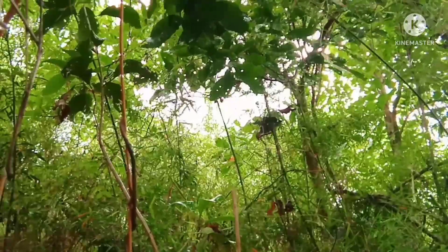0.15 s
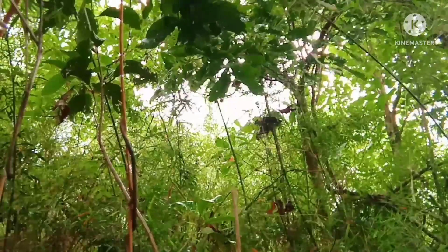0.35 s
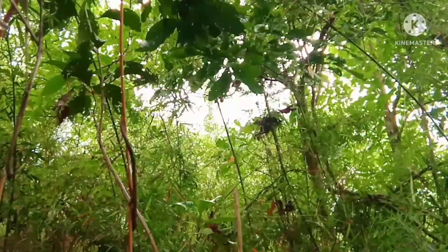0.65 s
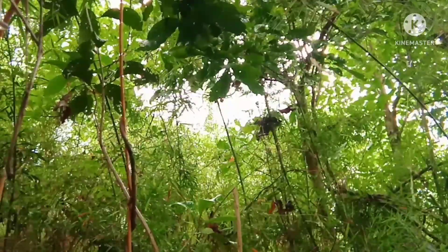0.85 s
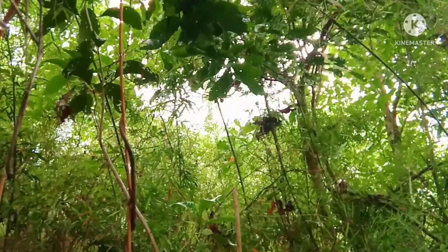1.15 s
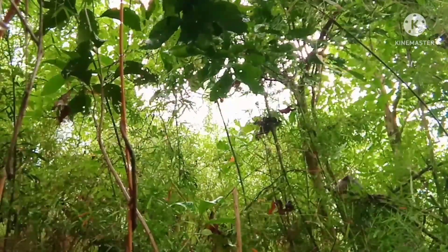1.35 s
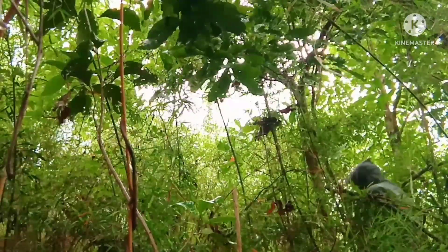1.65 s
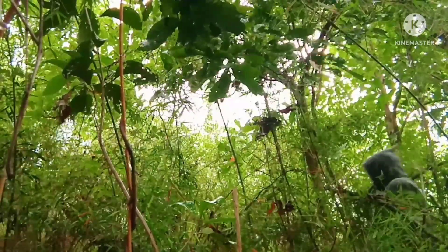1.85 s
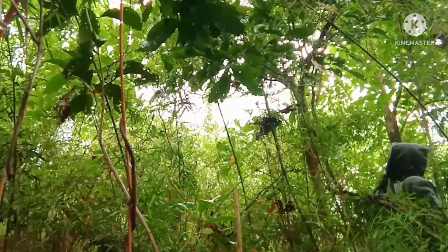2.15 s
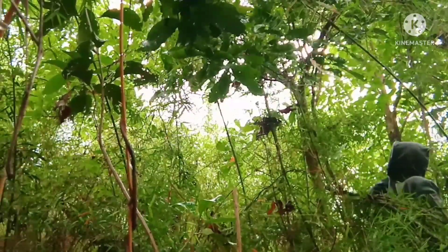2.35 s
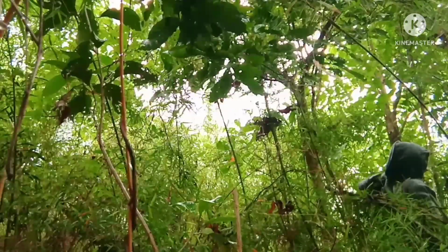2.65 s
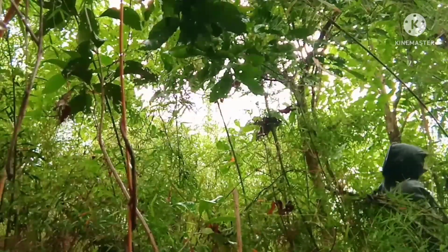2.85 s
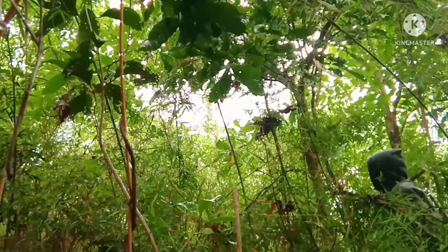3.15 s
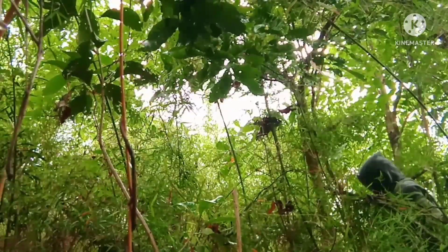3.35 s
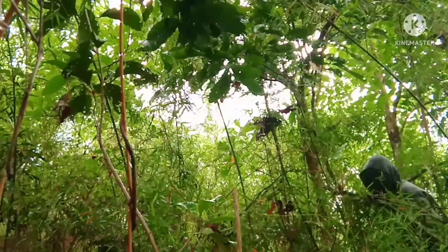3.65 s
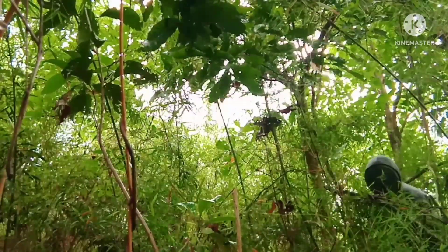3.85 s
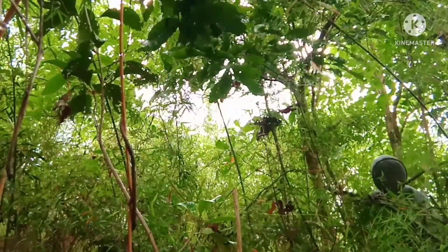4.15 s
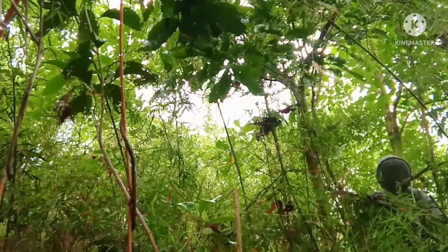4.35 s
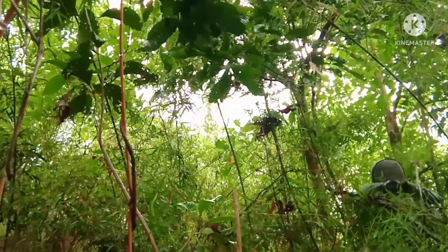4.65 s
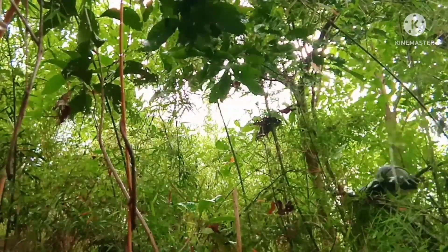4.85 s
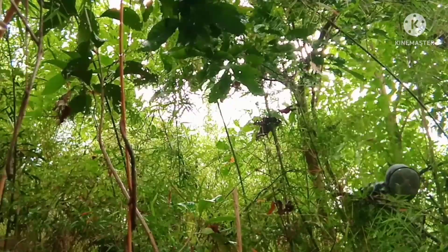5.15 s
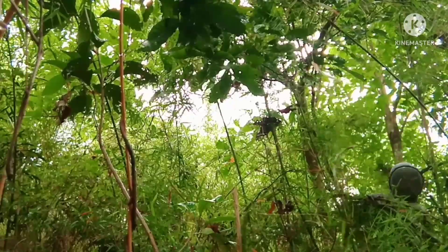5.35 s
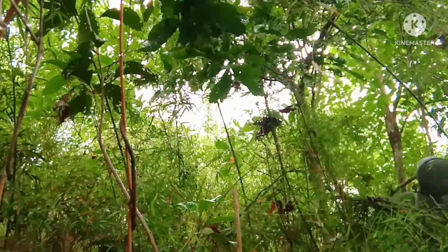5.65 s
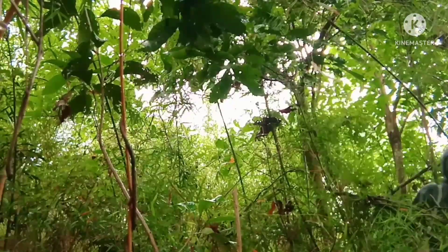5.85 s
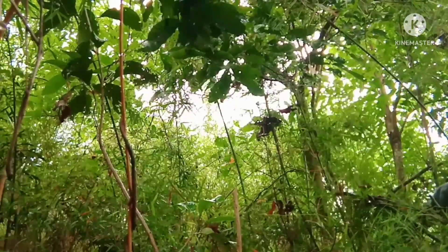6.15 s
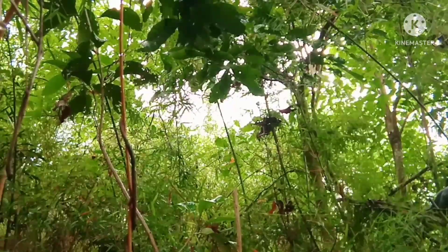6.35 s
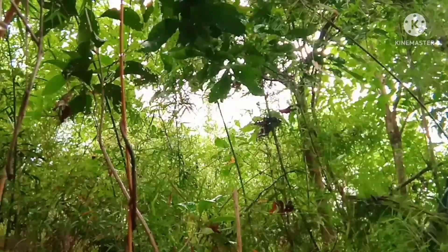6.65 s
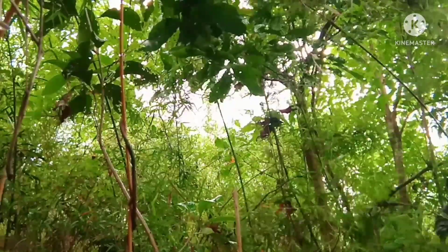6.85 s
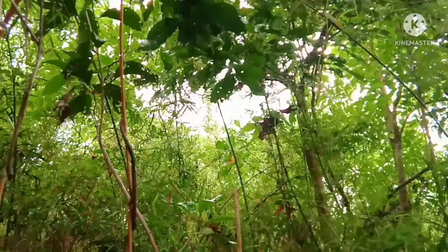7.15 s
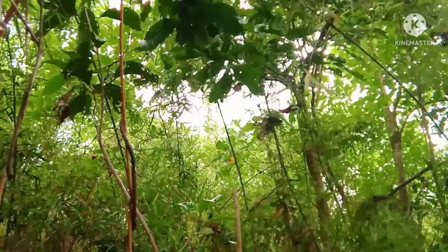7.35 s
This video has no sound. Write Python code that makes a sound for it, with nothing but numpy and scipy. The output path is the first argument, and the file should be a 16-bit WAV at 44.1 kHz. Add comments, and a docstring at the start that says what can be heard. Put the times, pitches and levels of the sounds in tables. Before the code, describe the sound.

Deep, steady buzzing of a hovering bee, with more bees behind, a cicada chorus and faint twig cracks in the undergrowth.

```python
"""A deep drone comes first: a large bee hovers close by in a bamboo thicket, beating its wings about
117 times a second. Each beat adds a puff of air, a flick and a snap to the hum. Other bees hum behind
it and a few dart past, dropping in pitch. Cicadas shrill in the trees over faint air, foliage and
recorder hiss, and dry twigs and leaves tick as someone moves through the undergrowth."""
import sys
import numpy as np
from scipy import signal
from scipy.fft import rfft, irfft, next_fast_len
from scipy.io import wavfile
from scipy.ndimage import uniform_filter1d, map_coordinates

SR = 44100
rng = np.random.default_rng(int(sys.argv[2]) if len(sys.argv) > 2 else 0)


def file_out(sig):
    """Save sig as 16-bit WAV at sys.argv[1]."""
    # one column per channel
    cols = np.atleast_2d(sig).T
    # limit, then scale
    lim = np.clip(cols, -1, 1)
    pcm = np.round(lim * 32767).astype(np.int16)
    wavfile.write(sys.argv[1], SR, pcm)


N = 330970
TIME = np.arange(N) / SR


def amp(db):
    """Turns decibels into a number to multiply by."""
    return 10 ** (np.asarray(db) / 20)


def unit(x):
    """Scales x to an average strength (rms) of 1."""
    return x / np.sqrt(np.mean(x ** 2) + 1e-20)


def curve(rows):
    """Joins (time, value) points with straight lines: one value per sample."""
    return np.interp(TIME, *np.transpose(rows))


def bump(at, half):
    """A smooth hill, 1 high at time `at` and about a third as high `half` seconds to either side."""
    return np.exp(-((TIME - at) / half) ** 2)


def level_at(points, hz):
    """Looks up the level at hz in a table of (frequency, level) points."""
    f, db = np.transpose(points)
    return np.interp(np.log(hz + 1), np.log(f + 1), db)


def colour(x, points):
    """Gives x a table's balance of low and high frequencies, then scales it to strength 1."""
    size = next_fast_len(len(x) + 2048)
    gains = amp(level_at(points, np.fft.rfftfreq(size, 1 / SR)))
    return unit(irfft(rfft(x, size) * gains, size)[:len(x)])


def wander(rate):
    """A smooth random wobble of strength 1 that changes about `rate` times a second."""
    knots = rng.standard_normal(4096)
    grid = np.arange(0, N, 32)
    smooth = map_coordinates(knots, [grid * rate / SR], mode="wrap")
    return unit(np.interp(np.arange(N), grid, smooth))


def cycles(hz):
    """Counts the vibrations completed so far as a pitch changes."""
    return np.cumsum(hz) / SR


# Tone colour of the quiet background, with the recorder's hiss near 14.4 kHz: f/Hz, level/dB
BACKGROUND_COLOUR = [(20, -9), (50, -3), (85, -9), (400, 0.5), (900, -8.5), (1600, -12.5), (2800, -28.5),
                     (4000, -39.5), (7000, -31.5), (10000, -38.5), (13700, -55), (14400, -23.5),
                     (15500, -36.5)]


def background(db=-48, swell_db=1):
    """Faint air and foliage, with the recorder's thin high hiss, make a soft, steady noise."""
    return amp(db + swell_db * wander(48)) * colour(rng.standard_normal(N), BACKGROUND_COLOUR)


def streaked_hiss(streak_db, width_hz, rise_per_s):
    """Hiss in which narrow bands of pitch stand out for a while and slowly rise."""
    hz, t, spectrum = signal.stft(rng.standard_normal(N), SR, nperseg=4096)
    lane = hz[:, None] * (1 - rise_per_s * t) / width_hz
    moment = np.broadcast_to(1.612 * t, lane.shape)
    streaks = map_coordinates(rng.standard_normal((2048, 32)), [lane, moment], order=1, mode="wrap")
    return signal.istft(spectrum * amp(streak_db * unit(streaks)), SR)[1][:N]


# Tone colour of many cicadas together: f/Hz, level/dB
CHORUS_SPECTRUM = [(2500, -20), (3700, -14.5), (4400, -7), (4800, -3), (5150, -2), (5500, -6), (6100, -4.5),
                   (6400, -10), (6650, -25), (7500, -28), (9000, -53)]


def cicada_chorus(db=-41, lull_db=-2, shimmer_db=0.5):
    """Many cicadas blur into one shimmering hiss that slowly eases off once and comes back."""
    hiss = streaked_hiss(streak_db=2.5, width_hz=19, rise_per_s=0.0088)
    level = db + lull_db * bump(at=4.77, half=1.6) + shimmer_db * wander(30)
    return amp(level) * colour(hiss, CHORUS_SPECTRUM)


def lone_cicada(start_s=0.36, length_s=7.05, low_hz=6870, high_hz=7280, width_hz=560):
    """One higher cicada repeats a long song that swells, climbs in pitch and quickly runs down."""
    progress = (TIME - start_s) / length_s % 1
    swell = abs(np.sin(np.pi * progress ** 1.8)) ** 0.65
    pitch = np.interp(progress, [0, 0.9, 1], [low_hz, high_hz, low_hz])
    carrier = np.exp(2j * np.pi * cycles(pitch))
    hiss = streaked_hiss(streak_db=-0.5, width_hz=25, rise_per_s=0.006)
    # Keep only the hiss near the pitch: shift it down to 0 Hz, filter it, shift it back.
    lowpass = signal.butter(3, width_hz / 2, fs=SR, output="sos")
    shrill = signal.sosfilt(lowpass, hiss / carrier) * carrier
    overtone = 1 + amp(-20) * np.exp(2j * np.pi * 1150 * TIME)  # adds a faint copy 1150 Hz higher
    return (amp(-71.5) + amp(-50) * swell) * unit((shrill * overtone).real)


# Pure notes in the chorus: t/s, level/dB, f/Hz, half length/s
CICADA_NOTES = [(1.9, -47.5, 4808, 0.62), (2.12, -47.5, 5500, 0.22), (2.4, -48.5, 5900, 0.2),
                (3.1, -57, 6120, 0.23), (4.53, -49, 6100, 0.24), (7.33, -43, 4640, 0.16)]


def cicada_notes(rise_per_s=0.0054, waver=0.0016):
    """Thin whistles fade in and out of the chorus, each rising a little."""
    out = np.zeros(N)
    for at, db, hz, half in CICADA_NOTES:
        pitch = hz * (1 + rise_per_s * (TIME - at) + waver * wander(90))
        out += amp(db) * bump(at, half) * unit(np.sin(2 * np.pi * cycles(pitch)))
    return out


def faint_twigs(count=7, db=-45.5, spread_db=8.5, rustle_s=0.02, knock_db=-14):
    """Extra rows for TWIG_CRACKS: small ticks in the undergrowth at random moments."""
    return [(when * N / SR, db + spread_db * (2 * force - 1), rustle_s, knock_db)
            for when, force in rng.random((count, 2))]


# Twigs cracking: t/s, relative level/dB, rustle length/s, knock boost/dB
TWIG_CRACKS = [(3.548, -35, 0.036, 8), (3.578, -27.5, .015, -4), (3.91, -35, 0.0077, -5),
               (3.935, -36, 0.027, -2), (4.629, -38, 0.022, -3), (5.029, -42, 0.0076, 13),
               (5.298, -32, 0.0044, -10), (5.536, -28, .013, 4), (6.616, -27, .013, -6),
               (6.885, -32, 0.043, -14), (7.009, -32, 0.018, -12), (7.087, -24, 0.0026, 6),
               (7.119, -33.5, .014, -11)]
# The notes a twig rings with: f/Hz, level/dB, time to fade by 60 dB/s
TWIG_RINGS = [(4300, -2, 0.047), (4140, -12, 0.043), (4910, 2.5, 0.0097), (4900, 1, 0.011)]
# Tone colour of dry crackling, with a thin microphone ring near 15 kHz: f/Hz, level/dB
CRACKLE_SPECTRUM = [(1000, -21.5), (3000, 16.5), (5000, 6), (7500, -3), (10000, -5.5), (13500, -9),
                    (15000, 8.5), (16000, -7.5)]


def twigs(crackle_db=-11, knock_db=-10, grain_db=5, settle_db=-17, settle_s=0.079, size=12000):
    """A twig cracks and rings briefly, then the leaves on it crackle and settle."""
    out, t = np.zeros(N + size), np.arange(size) / SR
    for at, db, rustle_s, boost_db in TWIG_CRACKS + faint_twigs():
        noise, grain_sizes = rng.standard_normal((2, size))
        grains = noise * amp(grain_db * unit(uniform_filter1d(grain_sizes, 25)))
        fade = np.exp(-t / rustle_s) + amp(settle_db) * np.exp(-t / settle_s)
        crackle = amp(crackle_db) * colour(grains, CRACKLE_SPECTRUM) * fade
        stiffness = rng.uniform(0.99, 1.01)  # each twig is tuned a little differently
        ring = sum(amp(ring_db - 60 * t / ring_s) * np.sin(2 * np.pi * hz * stiffness * t)
                   for hz, ring_db, ring_s in TWIG_RINGS)
        out[round(at * SR):][:size] += amp(db) * (crackle + amp(knock_db + boost_db) * ring)
    return out[:N]


def wing_buzz(hz, points, harmonics):
    """Beating wings make harmonics: tones at 1, 2, 3... times the rate of the beat."""
    angle = 2 * np.pi * (cycles(hz) + rng.random())
    return unit(sum(amp(level_at(points, k * hz.mean())) * np.cos(k * angle)
                    for k in range(1, harmonics + 1)))


# Tone colour of the farther bees: f/Hz, level/dB
FAR_BEE_COLOUR = [(150, -13), (300, -8.5), (450, -18.5), (750, -16.5), (1300, -16), (2500, -32.5)]


def far_bees(db=-46, hz=152, drift=0.04, swell_db=4, count=5):
    """Farther bees hum together, each wandering in pitch and distance."""
    out = np.zeros(N)
    for _ in range(count):
        pitch = hz * (1 + drift * wander(5) + 0.015 * wander(50))
        out += wing_buzz(pitch, FAR_BEE_COLOUR, harmonics=9) * amp(swell_db * wander(4))
    return amp(db) * unit(out)


# Bees darting past: t/s, level/dB, wingbeat f/Hz, half length/s
FLY_BYS = [(3.53, -27, 158.2, 0.033), (3.883, -34, 146, .035), (3.958, -34, 154.8, 0.031),
           (4.378, -38, 141.7, .07), (4.514, -32, 152, 0.044), (4.601, -28, 157.4, .03)]
# Tone colour of their buzz: f/Hz, level/dB
FLY_BY_COLOUR = [(140, -10), (158, 9.5), (300, 6), (450, -3), (750, -8), (1300, -12.5), (2500, -51)]
# Tone colour of air stirred by wings, theirs and the large bee's: f/Hz, level/dB
AIR_COLOUR = [(30, -4), (80, -11.5), (160, -0.5), (450, -6.5), (700, -9), (1100, -24), (1260, -15),
              (1450, -18.5), (2000, -13.5), (2700, -19), (4000, -32), (8000, -47)]


def passing_bees(pitch_drop=0.0081, unsteady=0.0089, air_share=0.21):
    """Each bee swells as it nears and drops in pitch as it leaves, dragging a rush of air."""
    out, waver = np.zeros(N), wander(60)
    rush = colour(rng.standard_normal(N), AIR_COLOUR)
    for at, db, hz, half in FLY_BYS:
        near = abs(TIME - at) < 4 * half
        position = (TIME[near] - at) / half  # below 0 coming, above 0 going
        pitch = hz * (1 - pitch_drop * np.tanh(position) + unsteady * waver[near])
        buzz = wing_buzz(pitch, FLY_BY_COLOUR, harmonics=14)
        out[near] += amp(db) * (buzz + air_share * rush[near]) / np.cosh(1.12 * position)
    return out


def once_per_beat(beats):
    """One click each time the count of wingbeats passes a whole number."""
    return np.diff(np.floor(beats), prepend=0) > 0


def wing_puffs(upstrokes, nearer_db, db=-46, sharpness=4, steady=0.29):
    """The wings stir the air all the time, with a stronger puff at the end of each upstroke."""
    puffs = steady + np.exp(sharpness * (np.cos(2 * np.pi * upstrokes) - 1))
    return amp(db + 0.77 * nearer_db + wander(15)) * colour(puffs * rng.standard_normal(N), AIR_COLOUR)


# Tone colour of a wing's light flick: f/Hz, level/dB
FLICK_SPECTRUM = [(100, -73.5), (800, -24.5), (1260, 2.5), (1450, -18), (2000, 8), (2700, -7.5),
                  (3300, -24.5), (6000, -53.5), (16000, -73.5)]


def wing_flicks(upstrokes, nearer_db, db=-53):
    """A light flick ends each upstroke, some stronger than others."""
    clicks = once_per_beat(upstrokes) * amp(2 * wander(60) + 2 * wander(7))
    return amp(db + 0.21 * nearer_db) * colour(clicks, FLICK_SPECTRUM)


# Spells when the wings snap hard: start t/s, end t/s, level/dB
SNAP_SPELLS = [(1.02, 1.699, -58.5), (5.35, 5.848, -53), (5.917, 6.494, -44.5), (6.51, 7.51, -55)]
# Tone colour of a snap: f/Hz, level/dB
SNAP_SPECTRUM = [(100, -72.5), (1200, -31.5), (2200, -28), (3000, 6), (4000, 6), (5000, -14), (8000, -47),
                 (16000, -77.5)]


def wing_snaps(beats, rest_db=-70.5, fade_s=0.027, uneven_db=4.5, sputter_db=1.2):
    """The wing snaps as it turns over: faintly between spells, hard and sputtering during them."""
    clicks = once_per_beat(beats) * amp(uneven_db * np.tanh(wander(110)))
    strength = np.full(N, amp(rest_db))
    for start, end, db in SNAP_SPELLS:
        inside_s = np.minimum(TIME - start, end - TIME)
        strength += amp(db) * np.clip(inside_s / fade_s + 0.5, 0, 1)
    sputter = amp(sputter_db * np.tanh(wander(22)))
    return strength * sputter * colour(clicks, SNAP_SPECTRUM)


def stroke_phase(k, swish=0.2, lead_beats=0.2, relax_beats=0.22):
    """Timing of harmonic k: a soft upstroke swish, then the downstroke's sudden push that relaxes."""
    upstroke = -1j * swish * k * np.exp(-(k / 3) ** 2 / 2) * np.exp(2j * np.pi * k * lead_beats)
    downstroke = 1 / (1 / (2 * np.pi * relax_beats) + 1j * k)
    return np.angle(upstroke + downstroke)


# How far the bee has turned side-on, heard as its second harmonic: t/s, level/dB
BEE_TURN = [(0.05, -50), (1.0, -43), (3.78, -42), (3.93, -34), (4.99, -36), (5.15, -44), (5.36, -36),
            (6.19, -34.5), (7.5, -36)]
# Balance of its low harmonics when head-on: harmonic number, level/dB
HEAD_ON = [(1, 4), (2, -11), (3, -8.5), (4, -10), (5, -19.5), (6, -28)]
# The same when side-on: harmonic number, level/dB
SIDE_ON = [(1, 2), (2, -8), (3, -11), (4, -8.5), (5, -14), (6, -16)]
# Tone colour of its rasp, with peaks the high harmonics glide through: f/Hz, level/dB
RASP_SPECTRUM = [(780, 0), (940, 5), (1080, -0.5), (1170, 4), (1260, 10.5), (1350, -1.5), (1480, -5),
                 (2000, -15.5), (2700, -33)]


def wing_drone(beats, hz, nearer_db, rasp_db, hum_db=-23.5, buzz_db=-33.5):
    """The deep hum hardly changes; the second harmonic beams sideways and grows as the buzz eases."""
    turn_db = curve(BEE_TURN)
    side_on = np.clip((turn_db + 43.5) / 10.5, 0, 1)  # 0 is head-on, 1 is side-on
    tones = {k: np.cos(2 * np.pi * k * beats + stroke_phase(k)) for k in range(1, 23)}
    low = [amp(head + (side - head) * side_on + 0.85 * wander(12)) * tones[k]
           for (k, head), (_, side) in zip(HEAD_ON, SIDE_ON)]
    high = sum(amp(level_at(RASP_SPECTRUM, k * hz)) * tones[k] for k in range(7, 23))
    hum = amp(hum_db + 0.15 * nearer_db - 0.08 * wander(5.3)) * unit(low[0])
    second = amp(turn_db) * unit(low[1])
    buzz = amp(buzz_db - 0.097 * (turn_db - turn_db.mean())) * unit(sum(low[2:]))
    # Each part flutters in loudness at its own speed.
    return (hum * (1 + 0.083 * wander(65))
            + second * (1 + 0.14 * wander(25))
            + buzz * (1 + 0.07 * wander(60))
            + amp(rasp_db) * unit(high * (1 + 0.32 * wander(110))))


# How fast the large bee beats its wings: t/s, f/Hz
BEAT_RATE = [(0.0, 126.7), (0.27, 113.9), (0.9, 116.4), (0.96, 114.3), (1.36, 118.8), (1.9, 116.6),
             (2.0, 115.7), (2.65, 116.5), (3.26, 116.1), (3.55, 121.1), (3.59, 129.4), (3.78, 138.9),
             (3.97, 123.6), (4.39, 119.9), (4.76, 122.4), (5.03, 113.8), (5.16, 124.3), (5.35, 119.9),
             (5.95, 113.6), (6.37, 113.7), (6.6, 117.9), (7.5, 116.9)]
# How near it hovers, heard as the strength of its rasp: t/s, relative level/dB
BEE_NEARNESS = [(0.03, -48), (0.3, -46.5), (0.82, -48), (0.92, -41.5), (1.36, -45.5), (2.98, -42.5),
                (3.4, -38.5), (3.59, -36.5), (3.65, -41), (3.84, -35.5), (5.29, -41), (6.1, -38),
                (6.79, -40), (7.5, -40)]
# Its beat stumbles as it dodges and again as it settles: t/s, half length/s
BEAT_STUMBLES = [(3.548, 0.0302), (3.883, 0.02)]


def hovering_bee(jitter=0.0088, stumble_jitter=0.07, stumble_db=-4):
    """The large bee's wings drone, brighter as it nears, and stumble twice as other bees dart close."""
    hz, nearness_db = curve(BEAT_RATE), curve(BEE_NEARNESS)
    nearer_db = nearness_db - nearness_db.mean()
    stumble = sum(bump(at, half) for at, half in BEAT_STUMBLES)
    beats = cycles(hz * (1 + (jitter + stumble_jitter * stumble) * wander(80)))
    upstrokes = beats + 0.1323  # each upstroke ends just before the wing turns over
    drone = amp(stumble_db * stumble) * wing_drone(beats, hz, nearer_db, rasp_db=nearness_db - 2)
    return drone + wing_puffs(upstrokes, nearer_db) + wing_flicks(upstrokes, nearer_db) + wing_snaps(beats)


def scene():
    """Bees, cicadas, twigs and the background add up in one channel."""
    bees = hovering_bee() + passing_bees() + far_bees()
    cicadas = cicada_chorus() + lone_cicada() + cicada_notes()
    return (bees + cicadas + twigs() + background())[None]


def record(dry, top_hz=15800):
    """The recorder cuts off the very highest treble."""
    lowpass = signal.firwin(511, top_hz, window=("kaiser", 9), fs=SR)
    return signal.oaconvolve(dry, lowpass[None], "same")


dry = scene()
out = record(dry)
file_out(out)
```